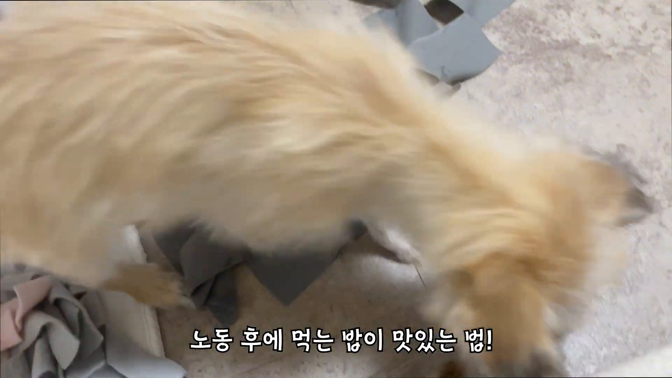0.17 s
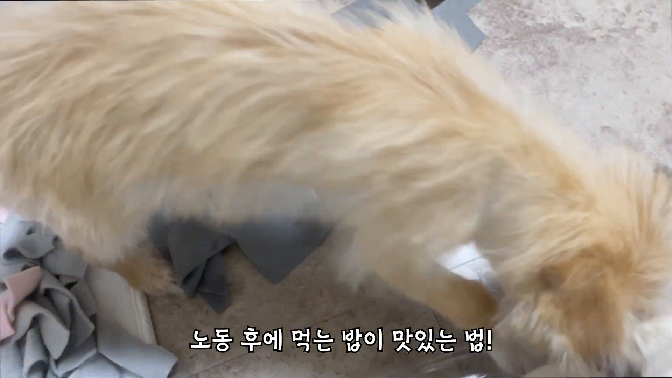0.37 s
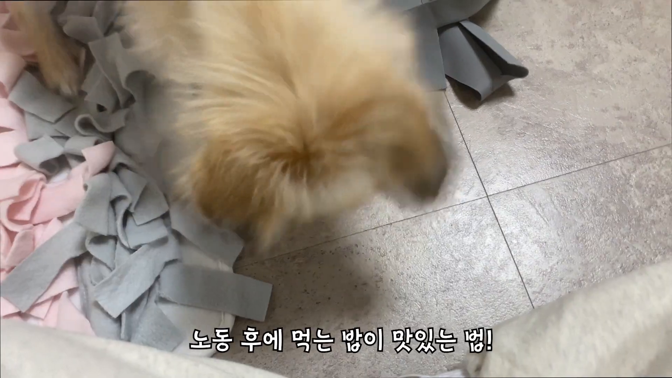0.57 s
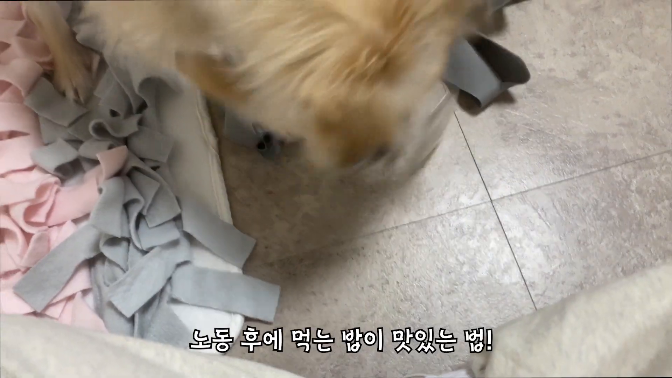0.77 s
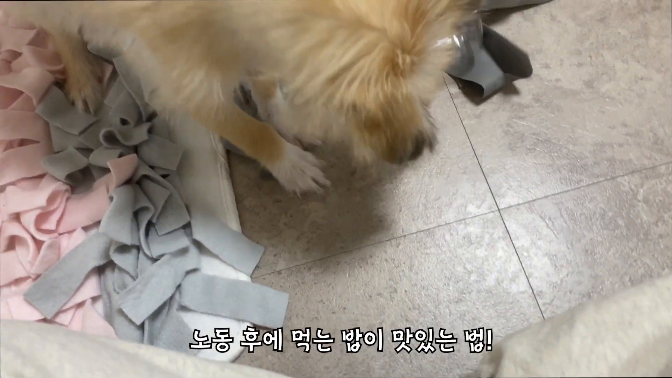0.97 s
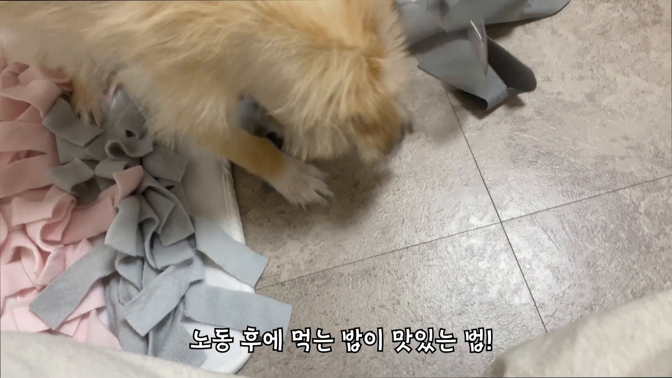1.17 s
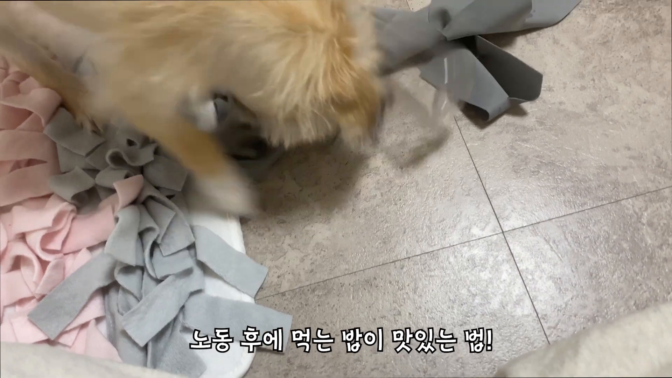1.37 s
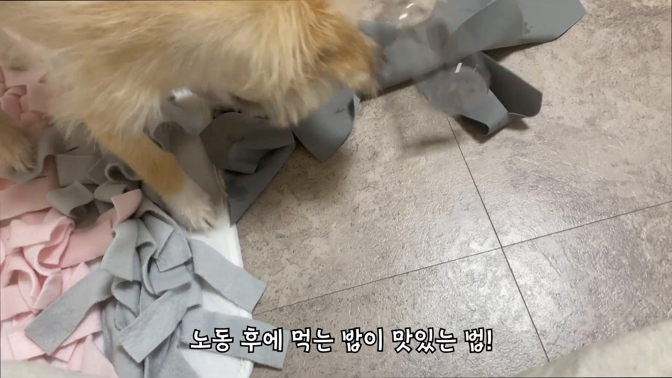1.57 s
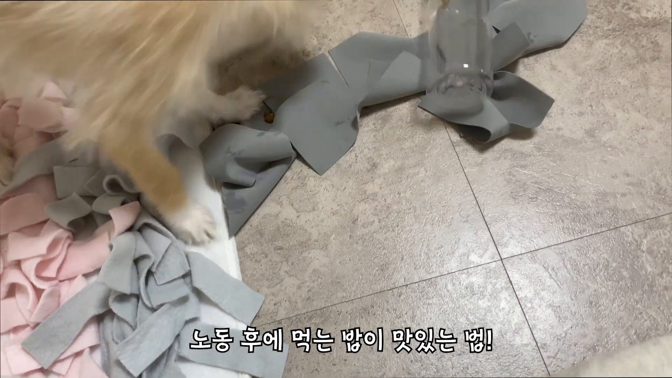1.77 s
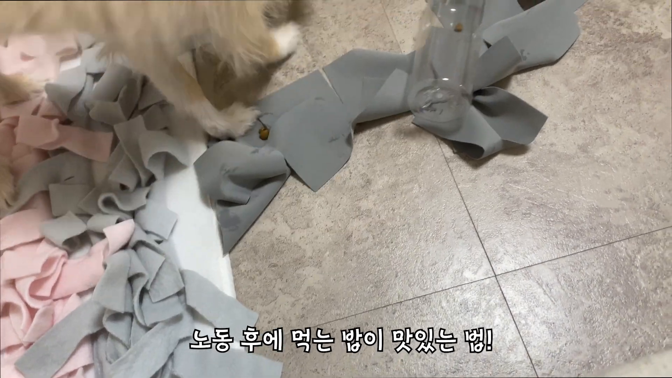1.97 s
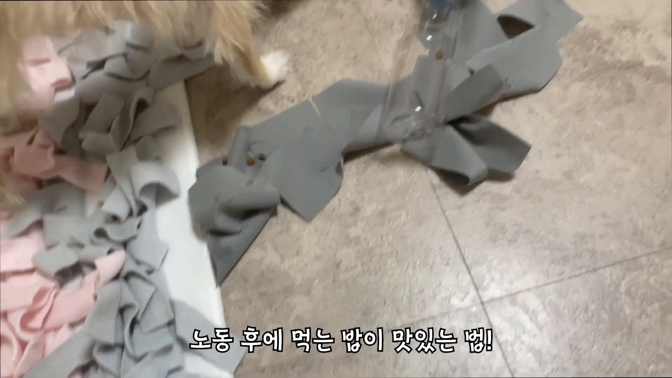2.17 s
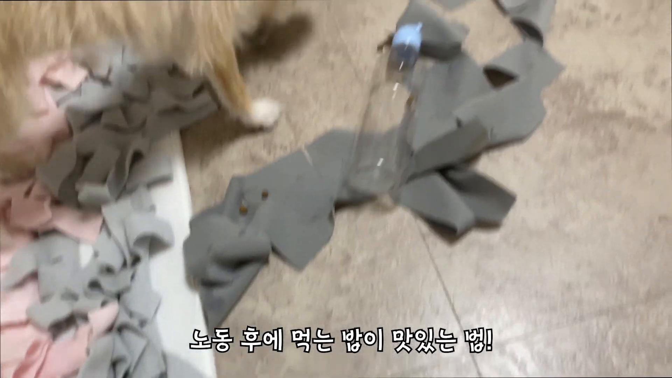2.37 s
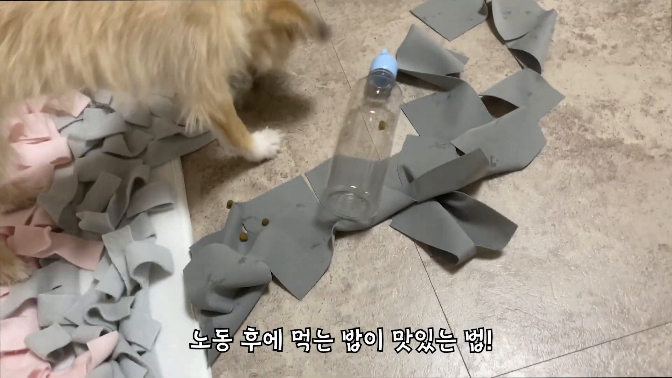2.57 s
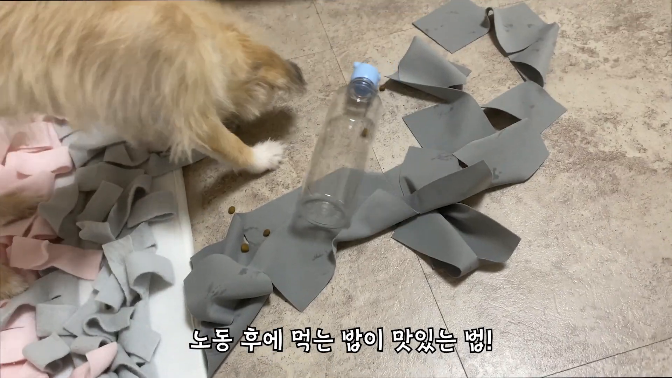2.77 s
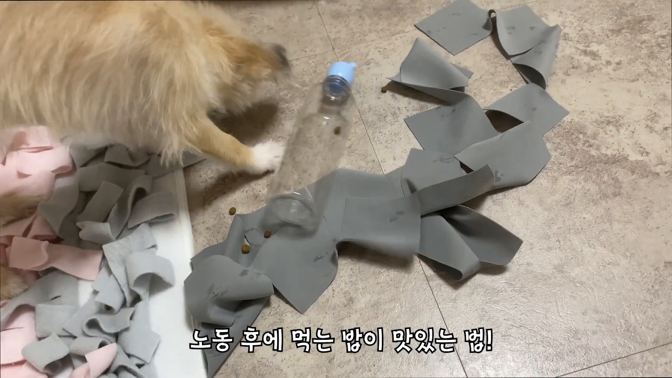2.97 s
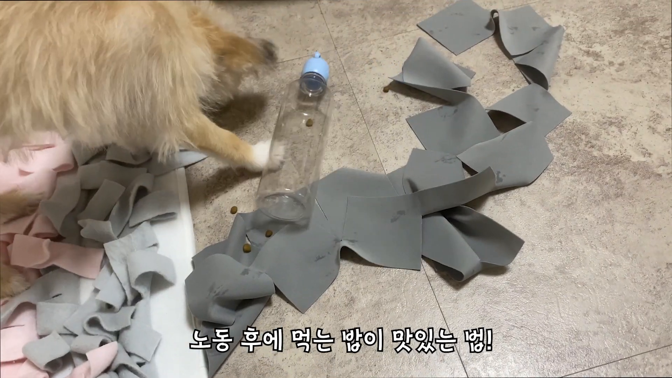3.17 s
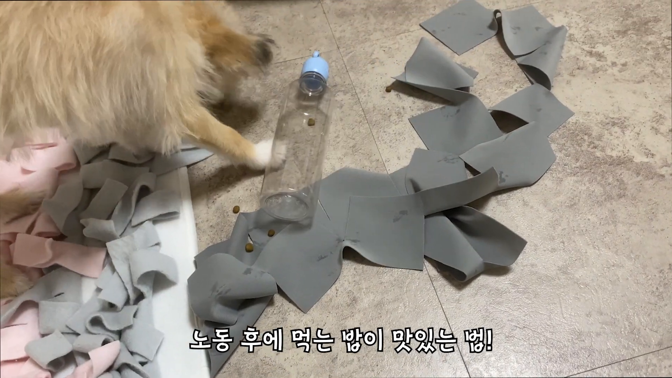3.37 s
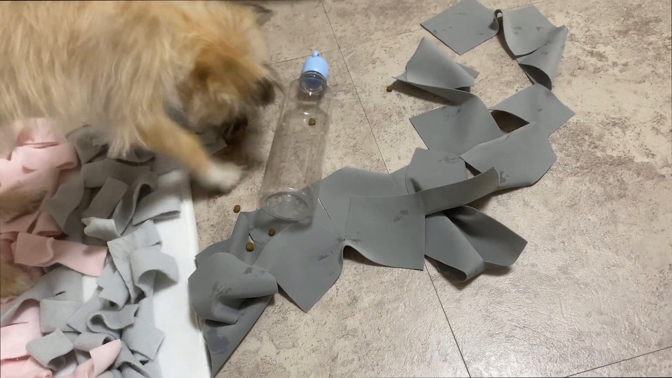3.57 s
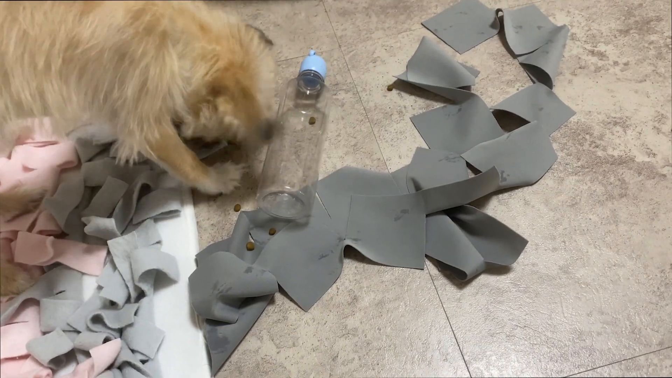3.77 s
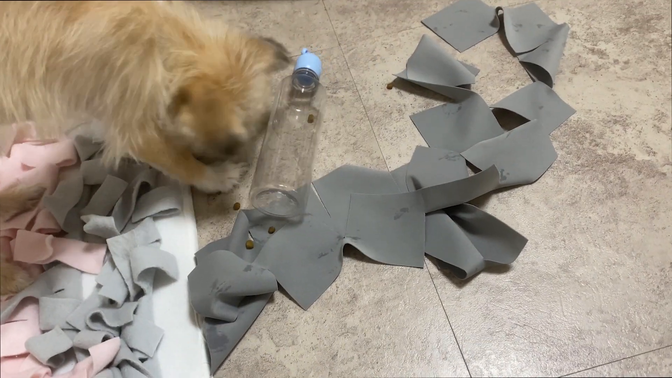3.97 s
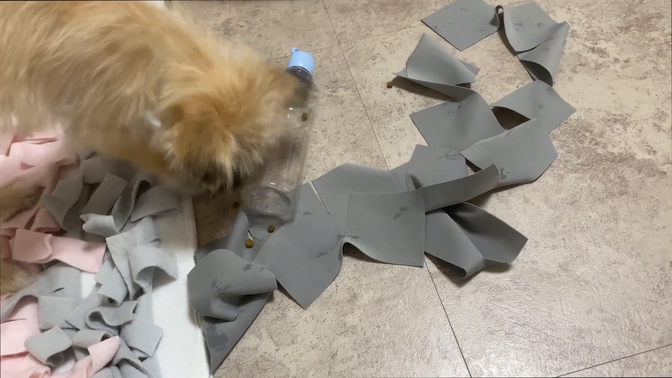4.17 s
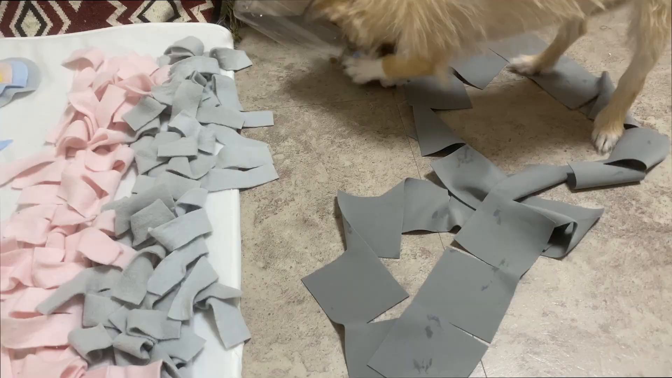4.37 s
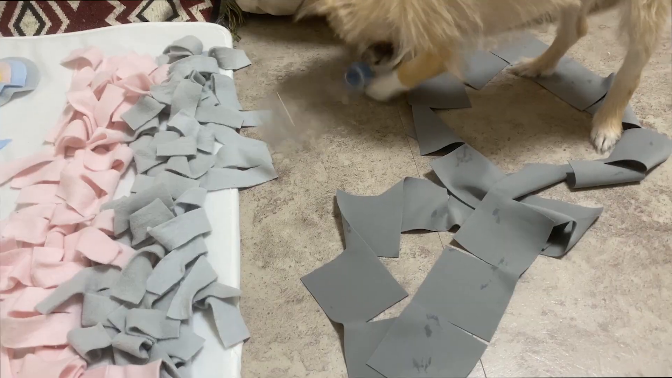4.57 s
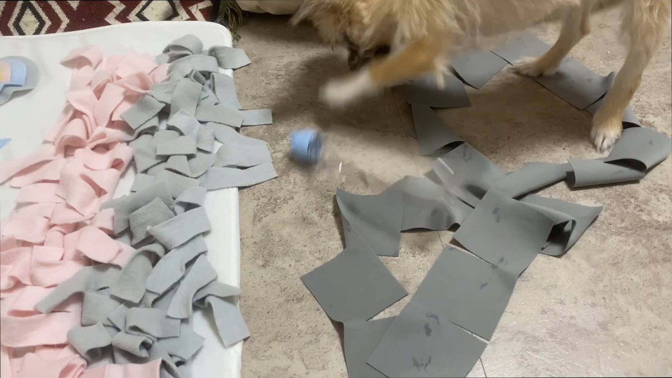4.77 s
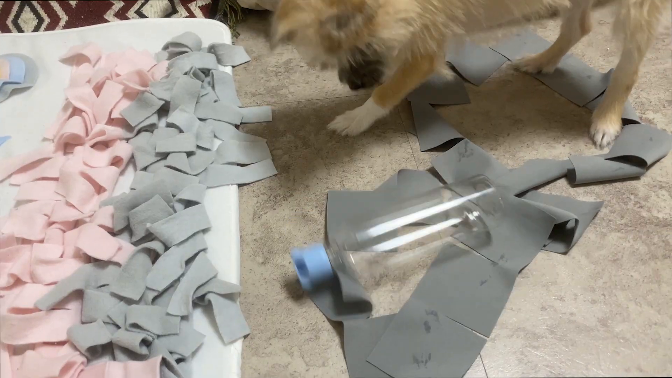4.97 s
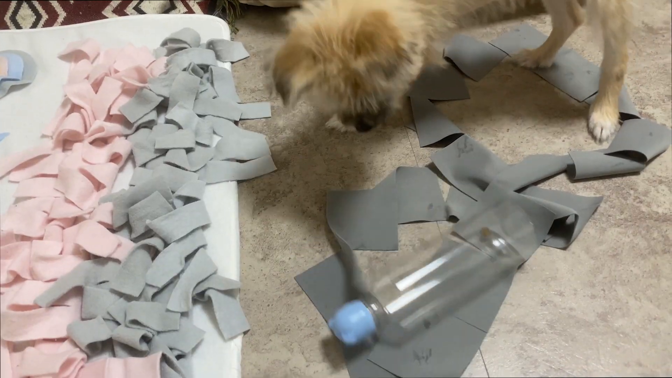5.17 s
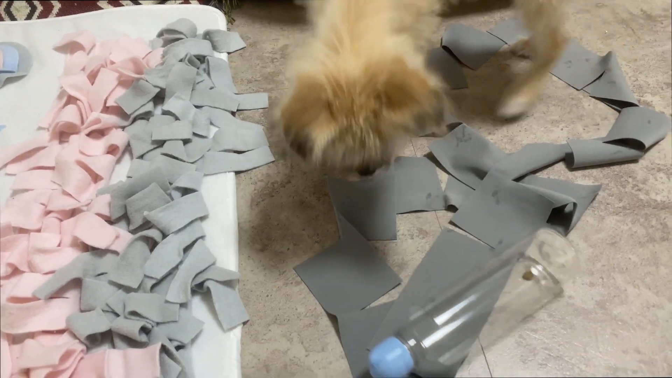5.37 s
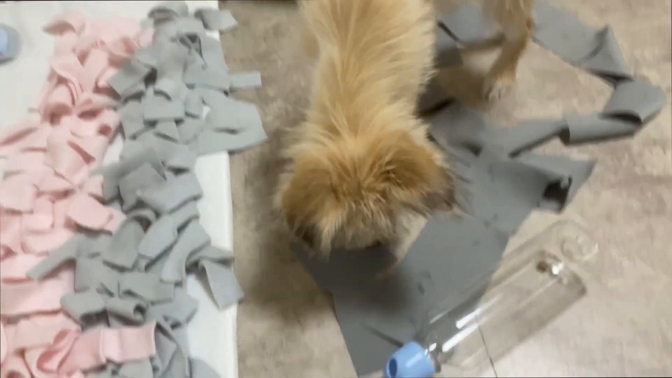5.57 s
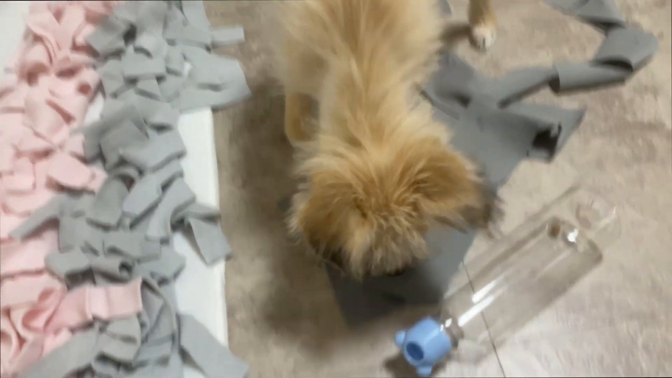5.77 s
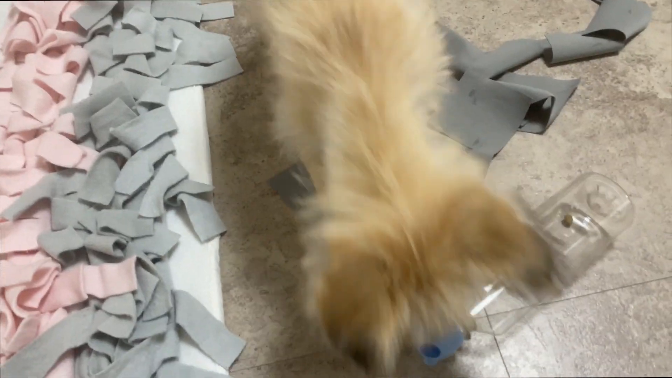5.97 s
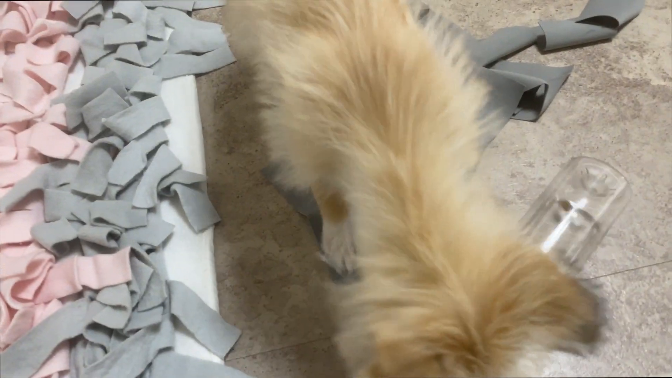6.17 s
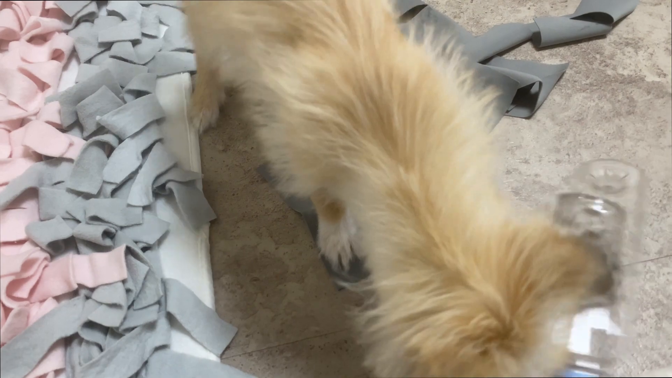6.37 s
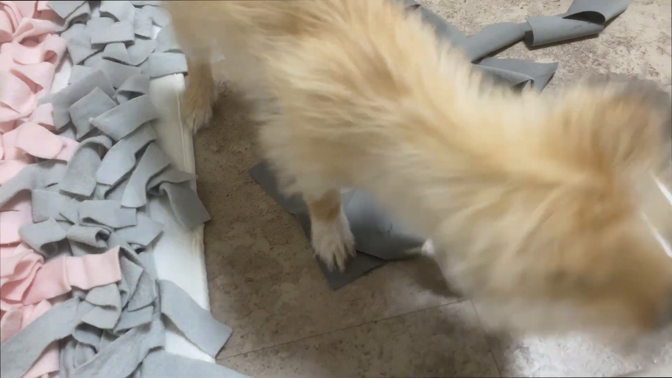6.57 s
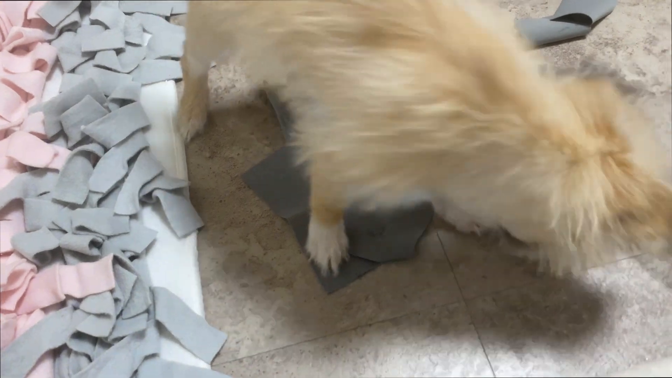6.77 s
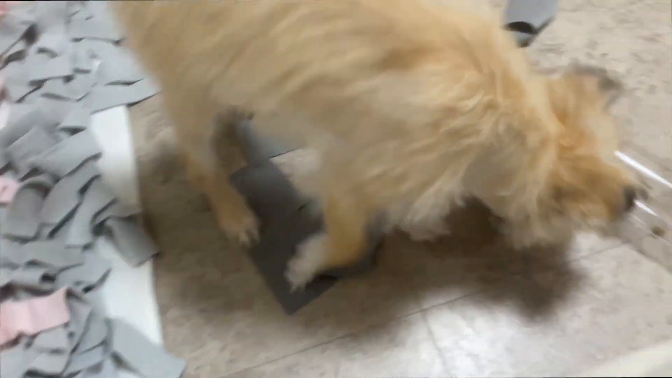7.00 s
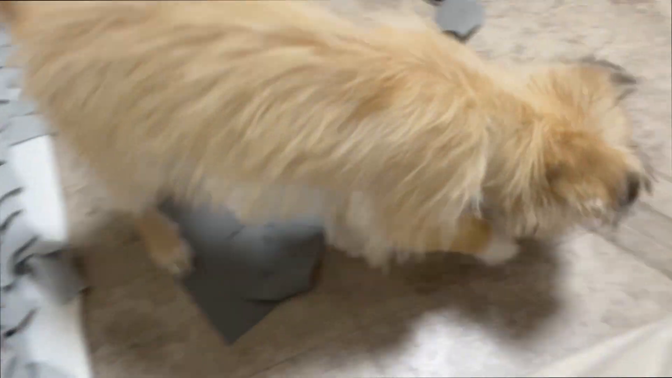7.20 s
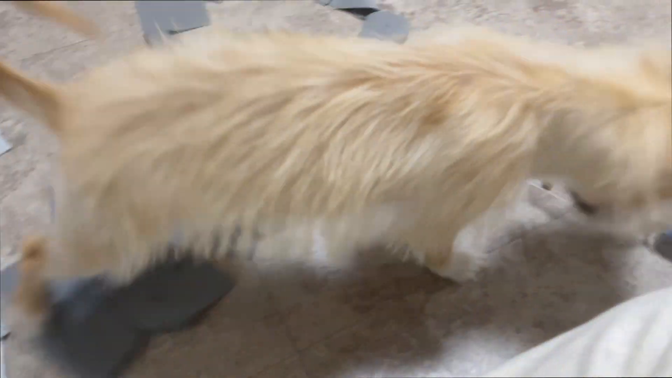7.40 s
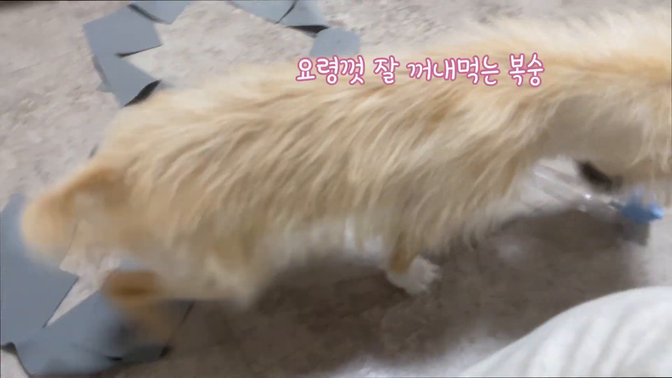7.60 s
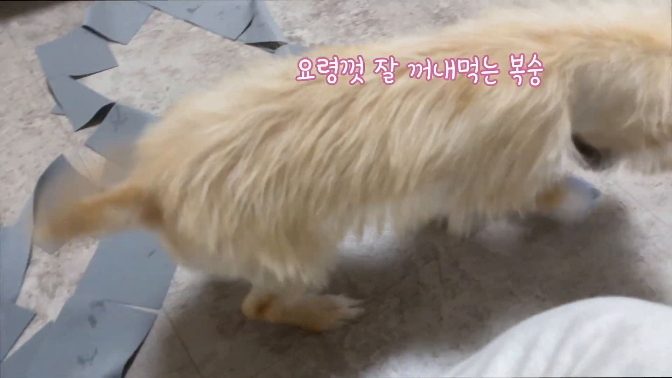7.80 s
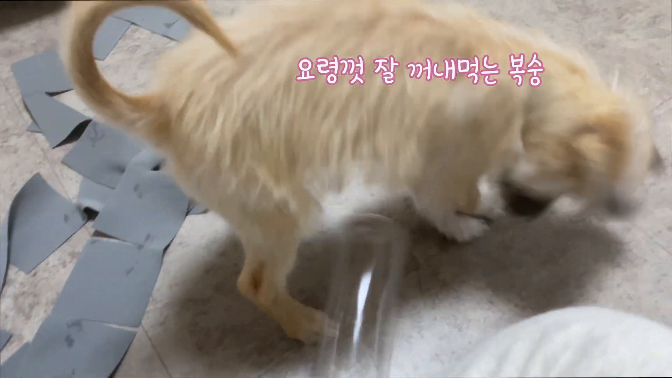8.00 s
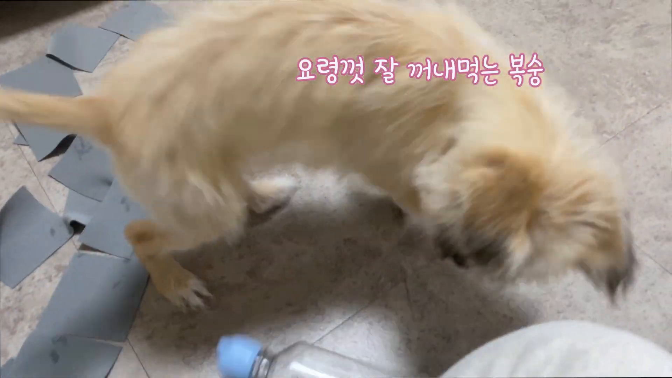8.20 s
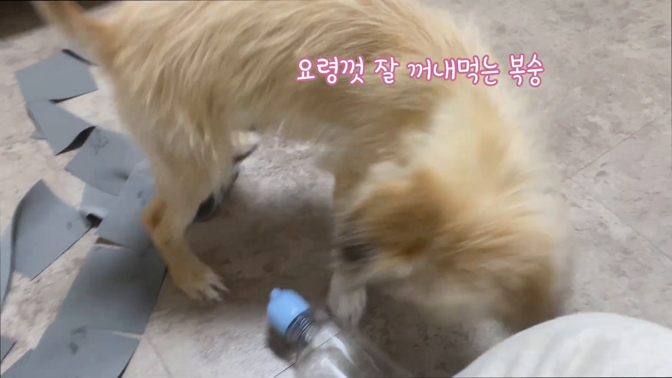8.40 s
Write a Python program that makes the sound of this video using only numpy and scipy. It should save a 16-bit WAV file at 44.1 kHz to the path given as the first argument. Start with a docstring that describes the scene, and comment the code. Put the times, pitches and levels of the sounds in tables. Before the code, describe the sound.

Hollow plastic bottle knocks and clatters on a hard indoor floor, dry kibble rattling inside, with lulls of soft paw taps and low hum.

```python
"""A plastic bottle, nosed and pawed by a puppy, knocks, rolls and booms on a vinyl floor: struck damped modes,
short noise cracks and a wavering neck tone. Dry kibble ticks and tumbles inside as random small contacts. Fur
and fleece rustle and the puppy licks (bursts of band noise); paws pat (dull sines falling in pitch). A low hum,
rumble, hiss and faint rising drone (shaped noise and a sine) fill a small room; hum and rumble are louder in
the first half. A phone held above hears it with two ports."""
import sys
import numpy as np
from scipy import signal
from scipy.fft import rfft, irfft, next_fast_len
from scipy.io import wavfile
from scipy.ndimage import map_coordinates

SR = 44100
rng = np.random.default_rng(int(sys.argv[2]) if len(sys.argv) > 2 else 0)


def decibels_to_gain(level_db):
    """Convert a level in decibels to a linear amplitude gain (20 dB per decade)."""
    exponent = np.asarray(level_db, float) / 20
    return 10 ** exponent


def master_out(mix):
    """Clip the mix to full scale and print it as 16-bit PCM to the path in sys.argv[1]."""
    frames = np.transpose(np.atleast_2d(mix))
    ceiling = np.clip(frames, -1, 1)
    pcm = np.round(ceiling * 32767).astype(np.int16)
    wavfile.write(sys.argv[1], SR, pcm)


N = 372204

# Table levels are relative: the functions add trims.
# bottle knocks on the floor: [start_s, shell_db, body_above_shell_db, wall_above_shell_db,
# tick_above_shell_db, favoured_hz]
KNOCKS = [(0.2904, -34, 2, -13, -20, 2400), (0.3168, -41, 10, -12, -4.5, 2320),
          (0.3364, -40.5, 7, 0, 0, 2500), (0.4736, -10, -8, -18.5, -17.5, 1248),
          (0.496, -28, -7.5, -12, -23, 1203), (0.7175, -18, -3, 2.5, -13.5, 1570),
          (0.8733, -40.5, -32, -11, -5, 2444), (1.1713, -18, -6.5, -4, -20, 1312),
          (1.3386, -7.5, -29, -8, -25, 1433), (1.3908, -21.5, -2.5, 4, -10.5, 2280),
          (1.4013, -21, -29, -6, -3, 3930), (1.519, -15.5, -3, 1, -13.5, 1851),
          (1.5455, -25, -6, -4, -2, 2162), (1.6408, -11, -32, -3, -14, 2255),
          (4.5077, -26, -12.5, 0, -10, 1327), (4.556, -25, -11.5, -10, -17, 1315),
          (4.5981, -13, -12, -4, -11, 2608), (4.6743, -13, -42, -8, -13.5, 2481),
          (4.7434, -19.5, -34, -12, -17, 2410), (4.798, -32.5, 2.5, -10.5, -4, 2540),
          (5.0348, -38.5, -34, 1, -3, 2110), (6.2207, -27, -6, -8.5, -9.5, 2273),
          (6.2772, -31.5, 2, -7.5, 2, 2440), (6.3118, -32.5, 0, -3.5, -6, 2130),
          (6.339, -39.5, 8, 1.5, -0.5, 2290), (7.933, -35.5, -10, 4.5, -4.5, 2293),
          (8.061, -26, 1, -12, -9.5, 2360), (8.098, -14, -4, -4.5, -21, 1504),
          (8.1837, -32.5, 7.5, 3.5, -8.5, 2096), (8.231, -17, -3.5, -3.5, -23.5, 1535),
          (8.292, -21, 2, -1, -20.5, 1710), (8.338, -22, -2, -4.5, -16.5, 1685),
          (8.3864, -33.5, -3.5, -4, -10, 2500), (8.4354, -23, 0.5, -8, -15, 2434)]
# kibble pieces hitting the wall: [start_s, wall_db, tick_above_wall_db, favoured_hz]
KIBBLE_TICKS = [(0.1338, -42.5, 3, 3960), (0.3633, -38, -1, 2260), (0.5259, -27.5, 4.5, 2260),
                (0.6644, -52.5, 6.5, 3800), (0.7548, -31, 3, 2410), (0.7737, -31.5, 2, 4480),
                (0.795, -44.5, 15, 4900), (1.118, -53, 2.5, 2110), (1.196, -45, 12.5, 5440),
                (1.2313, -48.5, 13.5, 5560), (1.3014, -45.5, 3, 5400), (1.4471, -38.5, -4, 2570),
                (1.4738, -41.5, -3.5, 2170), (1.7274, -47, 3.5, 2500), (1.8221, -54, 0.5, 3730),
                (1.8657, -59, -14, 2460), (1.8881, -57, -7, 2089), (2.729, -62.5, 0, 4630),
                (2.838, -62, -11, 2400), (4.82, -47, 1.5, 2420), (4.8514, -48.5, -2, 3900),
                (4.9633, -45.5, 11.5, 4240), (4.9947, -40.5, -0.5, 2100), (5.0882, -40, 6.5, 2170),
                (5.127, -42, 1, 2090), (5.1762, -52, -2.5, 2200), (6.1492, -69.5, 7.5, 2440),
                (6.3554, -46.5, 0.5, 2400), (6.3684, -45.5, 5.5, 2240), (6.3971, -45.5, -5.5, 2300),
                (6.4198, -43, -9.5, 2410), (6.4374, -47.5, -12, 2360), (7.9545, -33.5, 3, 2380),
                (7.9772, -48.5, 15, 2300), (8.1454, -51.5, 15.5, 4870), (8.217, -31, -4, 4000)]
# rolling and tumbling, one list a push: [time_s, wall_db, shell_above_wall_db, fizz_above_wall_db, fizz_hz]
ROLL_PUSHES = [
    [(0.0, -39.5, 2.5, -3.5, 4050), (0.19, -44, 0, -7, 4070), (0.27, -58, -3.5, -0.5, 4110),
     (0.31, -45.5, 4.5, -3.5, 4000), (0.43, -50.5, 2, -2.5, 3930), (0.5, -50, 8, -10, 4690),
     (0.56, -74.5, 0.5, 2.5, 3980), (0.72, -42, -4, 2, 4600), (0.88, -55, -4, 8.5, 5160),
     (1.0, -60.5, 4.5, -5, 5630), (1.12, -57, -5.5, -11, 4540), (1.2, -47, -4, 2, 5360),
     (1.27, -57.5, 2, 2, 5540), (1.35, -49.5, 1, 5.5, 5030), (1.56, -54.5, -10.5, -6, 3860),
     (1.62, -62, -8, -3, 4280), (1.72, -61, 2, 11.5, 4300), (1.95, -78, -3.5, -8.5, 3940)],
    [(4.44, -88.5, 11.5, -2, 5000), (4.53, -47.5, 4, -9, 5000), (4.63, -47, 9, -5, 3870),
     (4.76, -44.5, -4, -8.5, 5220), (4.81, -47, -6, -6, 3660), (4.94, -75, 5, -4.5, 4270),
     (4.975, -62, 2, 3, 4200), (5.05, -55, 3.5, 2, 4030), (5.14, -55.5, -2, -0.5, 4550),
     (5.3, -95, -9.5, 5.5, 3930)],
    [(6.12, -95, 4, -1, 4500), (6.26, -69.5, 12, 8, 4820), (6.36, -54.5, 2, -1, 5000),
     (6.48, -51.5, -5.5, -12.5, 4880), (6.71, -58.5, -8, -13.5, 4040), (6.8, -87.5, -5, -29, 4400)],
    [(7.7, -86, -2, -4, 5360), (7.81, -54.5, 1, -4, 4860), (7.87, -45, 3.5, -6, 4610),
     (8.0, -45.5, -8, -7, 4170), (8.12, -51.5, 1, -2.5, 3900), (8.25, -51.5, -2, -2.5, 4040),
     (8.44, -52.5, 6, -7, 3600)],
]
# soft nudges in the lulls: [peak_s, fade_in_s, fade_out_s, shell_db, wall_db]
NUDGES = [(2.37, 0.037, .07, -57.5, -54), (2.73, 0.016, 0.021, -75, -59.5),
          (2.84, 0.016, 0.051, -60.5, -62), (3.16, 0.036, .06, -57, -53), (3.195, .05, .04, -55, -56),
          (3.52, .12, .04, -62, -85.5), (4.32, 0.071, .035, -67.5, -61), (5.366, .004, 0.14, -60.5, -63.5),
          (5.46, .01, .04, -73.5, -69.5), (5.63, .006, 0.18, -71, -66.5), (5.76, 0.043, .05, -63, -61),
          (5.82, .08, 0.035, -59, -63), (6.902, .012, 0.041, -75.5, -75.5), (7.02, 0.05, .08, -66, -69),
          (7.304, .04, 0.24, -82, -76), (7.624, .012, .06, -65, -53.5)]
# place of the contacts: [time_s, left_right_db]
PLACE = [(0, -0.5), (1.9, 2), (4.5, 0.5), (5.2, 2.5), (6.2, 5), (6.8, 6.5), (7.7, 1.1)]
# bottle modes: [pitch_hz, level_db, t60_s]
BOTTLE_MODES = [(478.1, -1, 0.017), (572, -17, 0.066), (737, -13.5, 0.12), (889, -2.5, 0.012),
                (1113, -14, 0.17), (1097.6, 1, 0.054), (1187, -18.5, 0.087), (1306, -14.5, .02),
                (1700, -13, 0.0055), (1716, -8.5, 0.032), (1997, -1, 0.008), (2170, -30.5, 0.15),
                (2410, -1.5, 0.023), (2896, -9.5, 0.023), (3807, -14.5, 0.056), (3930, -10, 0.032),
                (4250, -14, 0.049), (4610, -9.5, 0.03), (5000, -14, 0.037), (5325, -7, 0.02),
                (5640, -9.5, 0.043), (6540, -3.5, 0.014), (7290, -15.5, 0.059)]
# zone centres, body, shell, wall, tick: [pitch_hz]
ZONES_HZ = [500, 1100, 2300, 3900]
# spectrum of the dry crack: [freq_hz, level_db]
CRACK_SPECTRUM = [(1500, -120), (3300, -6), (4200, 8), (9000, 4), (13000, -5.5), (16000, -19),
                  (17000, -120)]
# jolts to the air in the bottle: [start_s, level_db]
JOLTS = [(0.22, -36), (0.368, -32), (0.478, -30), (0.64, -48), (1.3, -34), (1.391, -20), (1.548, -32),
         (1.645, -29), (1.765, -44), (4.6, -44), (4.685, -45), (4.95, -50), (5.1, -46.5), (6.24, -42),
         (6.29, -43), (6.46, -75), (7.02, -45), (7.76, -47.5), (7.935, -37), (7.972, -31), (8.186, -36.5),
         (8.3, -39), (8.384, -34)]
# background level, dropping abruptly midway: [time_s, hum_db, rumble_db]
AIR = [(0.0, -47.5, -57), (0.6, -42, -63), (1.7, -44.5, -61), (2.5, -46, -63), (2.9, -44, -62),
       (4.41, -41.5, -60.5), (4.43, -54.5, -84), (4.75, -55, -80), (5.4, -54, -75), (6.0, -56.5, -78.5),
       (6.6, -58, -74), (7.1, -52, -76), (7.5, -59, -74.5), (8.1, -51, -70), (8.44, -62, -82)]
# hum spectrum: [freq_hz, level_db_per_hz]
HUM_SPECTRUM = [(15, -41), (25, -14), (41, -7.5), (59, 5.5), (70, -3.5), (103, -11), (129, -21), (140, -22),
                (180, -46.5), (310, -120)]
# room rumble spectrum: [freq_hz, level_db]
RUMBLE_SPECTRUM = [(71, -25.5), (120, -3), (152, -11), (222, -4), (449, -16), (1010, -21), (1100, -28),
                   (1370, -26.5), (2390, -38.5), (4000, -46.5), (5200, -76), (8800, -120)]
# microphone hiss spectrum: [freq_hz, level_db]
HISS_SPECTRUM = [(880, -37.5), (1500, -1), (3870, -10.5), (4400, -8), (8660, -2.5), (9390, -4),
                 (12600, -8.5), (13600, -40)]
# drone: [time_s, pitch_hz, level_db]
DRONE = [(3.58, 248.2, -64.5), (3.64, 252, -57), (4.02, 263.7, -48), (4.3, 269, -51), (4.41, 271.9, -54)]
# rustles and licks: [start_s, length_s, level_db, lowest_hz]
RUSTLES = [(1.967, .012, -68, 6060), (2.096, .012, -72, 7020), (2.165, 0.013, -63, 6050),
           (2.326, .11, -69.5, 6500), (2.605, 0.015, -73, 6000), (2.692, .09, -71, 4340),
           (3.13, 0.1, -65.5, 4500), (3.414, 0.014, -62, 5000), (3.715, 0.014, -73, 5000),
           (3.748, 0.02, -69, 5000), (4.299, 0.033, -70.5, 7000), (7.289, 0.17, -72, 7940),
           (7.619, 0.05, -64, 3480)]
# paw pats: [start_s, level_db, reference_hz]
PAWS = [(2.385, -31, 217), (4.577, -33, 222), (4.599, -25.5, 282), (4.773, -35.5, 150), (4.788, -29.5, 328),
        (4.871, -32, 298), (4.938, -42, 232), (4.953, -44, 348), (4.995, -36, 241), (5.044, -41, 334),
        (6.954, -42, 252), (7.161, -37.5, 178.2)]
# background likeness at the ports: [freq_hz, correlation]
ALIKE = [(60, .98), (170, .92), (260, .8), (450, .3), (700, .55), (1100, .25), (2300, .55), (5000, .4),
         (6500, .25), (8300, .85), (13000, .85)]
# background port level difference: [freq_hz, left_right_db]
FAR_TILT = [(60, 1.5), (700, 2.2), (2300, .8), (4500, -4.5), (8300, -2.5), (11000, -.5)]
# background port phase difference: [freq_hz, left_right_rad]
FAR_LEAD = [(60, .2), (200, .2), (300, .8), (500, 2.6), (1600, 3.2), (2100, -.6), (5000, -1.6),
            (8300, -2.1), (11000, -1), (13800, 0)]
# near-sound port level difference: [freq_hz, left_right_db]
NEAR_TILT = [(150, 2), (500, 3), (1500, 1.26), (6000, -7), (13000, 0.66)]
# near-sound port phase difference: [freq_hz, left_right_rad]
NEAR_LEAD = [(100, .1), (430, -.1), (1550, -.25), (2300, -.5), (4000, -.8), (5700, -2.2), (8300, -2.1),
             (10000, -1.4), (11700, -.6), (13800, -.1)]
# decay of the room's answer: [freq_hz, t60_s]
WALLS = [(200, .3), (1000, 0.23), (4000, .25), (12000, 0.037)]
# brief drops in level of all near sounds and their echo: [start_s, loss_db]
DIPS = [(0.51, 17.5), (1.372, 4.5), (8.135, 3.5)]

TICK_BODY_DB, TICK_SHELL_DB = -17, -9.5  # against the wall
NUDGE_FADE_DB, NUDGE_FIZZ_DB = 29.5, -14  # loss over one fade; fizz against the wall
BIGGEST_STEPS, CLUMP_DB = 4.5, 3.2  # grain size limit in mean steps; swell of grain clumps
PAN_SCATTER_DB, STRENGTH_SCATTER_DB = 2, 2.5  # contact to contact
FAVOUR_DB, FAVOUR_WIDTH_LOG_HZ = 10.5, 0.09
CLUSTER_HZ, DULL_CYCLES = 400, 60  # modes dying within fewer cycles are dull
CRACK_T60_S = 0.008
NECK_HZ, BOOM_WAVER_DB = 209.1, 5
ROLL_BOOM_DB, FIZZ_DULLS, IDLE_BOOM_DB = -15, 0.56, -7.5  # FIZZ_DULLS: boom dB lost per fizz dB
JOLT_ATTACK_S, JOLT_T60_S = 0.0082, 0.21
ROLL_RUMBLE_DB, RUMBLE_WAVER_DB, HISS_DB = -13.5, 1.2, -84
GRIT_DB = 5
WET_DB = -13.5
DIP_S, RETURN_S = 0.002, 0.078
TOP = 0.88  # ceiling of the rounded peaks


def unit(x):
    """Scale to rms 1."""
    return x / np.sqrt(np.mean(x ** 2) + 1e-20)


def along(points, hz):
    """Interpolate (Hz, value) points on a log-frequency axis."""
    f, v = np.transpose(points)
    return np.interp(np.log(hz + 1), np.log(f + 1), v)


def curves(rows, **ends):
    """One value per sample for each column after the time."""
    s, *cols = np.transpose(rows)
    return [np.interp(np.arange(N) / SR, s, c, **ends) for c in cols]


def wobble(knots_per_s):
    """Smooth random curve."""
    knots = rng.standard_normal(int(N * knots_per_s / SR) + 4)
    return map_coordinates(knots, [np.arange(N) * knots_per_s / SR])


def filtered(x, response):
    """Apply a complex frequency response."""
    m = next_fast_len(N + SR // 2)
    return irfft(rfft(x, m) * response(np.fft.rfftfreq(m, 1 / SR)), m)[..., :N]


def ports(pair, tilt, lead):
    """Level and phase differences between the two microphone ports, split evenly."""
    def half(points, hz):
        return np.outer([0.5, -0.5], along(points, hz))

    return filtered(pair, lambda hz: decibels_to_gain(half(tilt, hz)) * np.exp(1j * half(lead, hz)))


def stir():
    """Bottle motion per sample: shell, wall and fizz dB, brightest fizz Hz."""
    roll_db, shell_db, fizz_db, fizz_hz = curves(np.vstack(ROLL_PUSHES))
    zones_db = np.array([roll_db + shell_db, roll_db, roll_db + fizz_db])
    t = np.arange(N) / SR
    for peak_s, rise_s, fall_s, shell_db, wall_db in NUDGES:
        fade_db = NUDGE_FADE_DB * np.maximum((peak_s - t) / rise_s, (t - peak_s) / fall_s)
        nudge_db = np.c_[[shell_db, wall_db, wall_db + NUDGE_FIZZ_DB]]
        zones_db = np.maximum(zones_db, nudge_db - fade_db)
    return *zones_db, fizz_hz


def contacts(count=6500):
    """Knocks, kibble ticks and random kibble and floor grains: sample, dB in each zone, favoured Hz."""
    knock_s, shell, body, wall, tick, knock_hz = np.transpose(KNOCKS)
    knocks_db = shell + np.array([body + 2, 0 * shell - 1, wall + 1, tick + 1])
    tick_s, wall, tick, tick_hz = np.transpose(KIBBLE_TICKS)
    ticks_db = wall + np.array([0 * wall + TICK_BODY_DB, 0 * wall + TICK_SHELL_DB, 0 * wall, tick])

    grain_at = np.sort(rng.integers(0, N, count))
    steps = np.minimum(rng.exponential(size=count), BIGGEST_STEPS)
    size_db = 3.4 * steps + CLUMP_DB * wobble(30)[grain_at]  # few big grains, in clumps
    shell_db, wall_db, fizz_db, fizz_hz = (c[grain_at] for c in stir())
    grains_db = size_db + np.array([shell_db - 8.5, shell_db - 11.5, wall_db - 3.5, fizz_db - 11.5])

    listed_at = np.minimum(np.round(np.r_[knock_s, tick_s] * SR).astype(int), N - 1)
    at = np.r_[listed_at, grain_at]
    return at, np.c_[knocks_db, ticks_db, grains_db], np.r_[knock_hz, tick_hz, fizz_hz]


def train(at, size, pan_db):
    """Stereo impulses at the given samples."""
    return np.array([np.bincount(at, size * decibels_to_gain(side * pan_db), N)[:N] for side in (0.5, -0.5)])


def ring(blows, hz, t60_s):
    """Damped mode: each blow starts a dying sine of its own size."""
    r, w = decibels_to_gain(-60 / (t60_s * SR)), 2 * np.pi * hz / SR
    return signal.lfilter([0, r * np.sin(w)], [1, -2 * r * np.cos(w), r * r], blows)


def bottle():
    """Each contact rings every mode at a new strength and adds a short dry noise crack."""
    at, zones_db, favoured_hz = contacts()
    light = np.arange(len(at)) >= len(KNOCKS) + len(KIBBLE_TICKS)
    pan_db = curves(PLACE)[0][at] + PAN_SCATTER_DB * rng.standard_normal(len(at))
    scatter = rng.standard_normal((len(at), len(BOTTLE_MODES)))
    pose = rng.integers(-1, 2, scatter.shape)  # soft wall held flat, true or sharp
    sign = np.where(light, rng.choice([-1, 1], len(at)), 1)  # grains strike from either side
    out = np.zeros((2, N))
    for k, (hz, mode_db, t60_s) in enumerate(BOTTLE_MODES):
        share = [np.interp(np.log(hz), np.log(ZONES_HZ), row) for row in np.eye(len(ZONES_HZ))]
        distance = np.log(hz / favoured_hz) / FAVOUR_WIDTH_LOG_HZ
        bright_db = FAVOUR_DB * np.exp(-distance ** 2)  # where it was struck
        held_db = -6.5 * light * (hz * t60_s < DULL_CYCLES)  # light grains hardly dent the wall
        level_db = share @ zones_db + mode_db + bright_db + held_db
        level_db = level_db + STRENGTH_SCATTER_DB * scatter[:, k]
        phase = (-1) ** round(hz / CLUSTER_HZ)  # close modes start together, clusters alternate
        size = phase * sign * decibels_to_gain(level_db)
        for bend in (-1, 0, 1):
            blows = train(at, size * (pose[:, k] == bend), pan_db)
            out += ring(blows, hz * (1 + 0.024 * bend), t60_s)
    crack = train(at, decibels_to_gain(zones_db[-1] + 3.0 - 3.1 * light), pan_db)
    envelope = signal.lfilter([1], [1, -decibels_to_gain(-60 / (CRACK_T60_S * SR))], crack)
    burst = envelope * rng.standard_normal(N)
    return out + filtered(burst, lambda hz: decibels_to_gain(along(CRACK_SPECTRUM, hz)))


def neck():
    """Air booms through the bottle neck, a wavering sine driven by jolts, rolling and room rumble."""
    hz = NECK_HZ + 4 * wobble(14)
    roll_db, _, fizz_db, _ = curves(np.vstack(ROLL_PUSHES))
    rolling = decibels_to_gain(roll_db + ROLL_BOOM_DB - FIZZ_DULLS * fizz_db)  # less when only the kibble slides
    idle = decibels_to_gain(curves(AIR)[1] + IDLE_BOOM_DB)
    size = (rolling + idle) * decibels_to_gain(BOOM_WAVER_DB * wobble(18))
    for start_s, db in JOLTS:
        t = np.maximum(np.arange(N) / SR - start_s, 0)
        size = size + decibels_to_gain(db + 1.5 - 60 * t / JOLT_T60_S) * (1 - np.exp(-t / JOLT_ATTACK_S))
    return size * np.sin(2 * np.pi * np.cumsum(hz) / SR)


def rush(spectrum):
    """Stereo noise, scaled to rms 1, partly shared by the ports."""
    def response(hz):
        turn = np.arccos(np.clip(along(ALIKE, hz), 0, 1)) / 2
        return decibels_to_gain(along(spectrum, hz)) * np.array([np.cos(turn), np.sin(turn)])

    mid, side = filtered(rng.standard_normal((2, N)), response)
    return unit(ports(np.array([mid + side, mid - side]), FAR_TILT, FAR_LEAD))


def background():
    """Shaped noise for hum, room and rolling rumble and hiss; a slowly rising sine for the drone."""
    hum_db, room_db = curves(AIR)
    hum = decibels_to_gain(hum_db + 1.5) * rush(HUM_SPECTRUM)
    rumble_size = decibels_to_gain(room_db + 5.0) + decibels_to_gain(curves(np.vstack(ROLL_PUSHES))[0] + ROLL_RUMBLE_DB)
    rumble = rumble_size * decibels_to_gain(RUMBLE_WAVER_DB * wobble(15)) * rush(RUMBLE_SPECTRUM)
    drone_hz = curves(DRONE)[0]
    drone_db = curves(DRONE, left=-120, right=-120)[1] + 1.5 * wobble(5.9)
    drone = decibels_to_gain(drone_db) * np.sin(2 * np.pi * np.cumsum(drone_hz) / SR)
    return hum + rumble + drone + decibels_to_gain(HISS_DB) * rush(HISS_SPECTRUM)


def rustle():
    """Short bursts of band-limited noise from rustling fur and fleece and licks, roughened by wet little ticks."""
    out = np.zeros(N)
    grit = decibels_to_gain(GRIT_DB * wobble(330))
    for start_s, length_s, db, low_hz in RUSTLES:
        start, n = round(start_s * SR), round(length_s * SR)
        band = signal.butter(2, [low_hz, 13500], "band", fs=SR, output="sos")
        puff = unit(signal.sosfilt(band, rng.standard_normal(n)) * grit[start:][:n])
        out[start:][:n] += decibels_to_gain(db) * np.hanning(n) * puff
    return out


def paws():
    """Soft pads: a barely ringing push falling from 1.49 towards 0.49 of its reference pitch."""
    out, t = np.zeros(N), np.arange(SR // 10) / SR
    for start_s, db, hz in PAWS:
        cycles = np.cumsum(hz * (0.49 + np.exp(-t / 0.0061))) / SR
        envelope = decibels_to_gain(db + 7.0 - 60 * t / 0.036) * (1 - np.exp(-t / 0.0038))
        out[round(start_s * SR):][:len(t)] += envelope * np.sin(2 * np.pi * cycles)
    return out


def walls(x):
    """Room answer: delayed noise tail, each frequency dying at its own speed."""
    hz, t, z = signal.stft(rng.standard_normal((2, SR // 2)), SR, nperseg=256)
    decay = decibels_to_gain(-60 * t / along(WALLS, hz)[:, None])
    tail = signal.istft(z * decay, SR, nperseg=256)[1]
    late = np.pad(x, (260, 0))[None]  # delay in samples
    return signal.fftconvolve(late, tail / np.linalg.norm(tail[0]), axes=1)[:, :N]


def dip():
    """Gain of all near sounds and their echo: drops quickly at each dip, then returns."""
    start_s, loss_db = np.transpose(DIPS)
    t = np.maximum(np.arange(N) / SR - np.c_[start_s], 0)
    return decibels_to_gain(-loss_db @ ((1 - np.exp(-t / DIP_S)) * np.exp(-(t / RETURN_S) ** 2)))


def scene():
    """Near sounds reach the ports unequally, the room answers, both dip briefly; the background is added."""
    near = bottle() + neck() + rustle() + paws()
    direct = ports(near, NEAR_TILT, NEAR_LEAD)
    echo = decibels_to_gain(WET_DB) * walls(near.mean(axis=0))
    return dip() * (direct + echo) + background()


def band_limit(x):
    """A steep low-pass at the top of the band."""
    return signal.sosfilt(signal.butter(12, 16330, fs=SR, output="sos"), x)


def record(dry):
    """The microphone drops the lowest bass; the input stage rounds off loud peaks."""
    low_cut = signal.butter(6, 40, "high", fs=SR, output="sos")
    heard = signal.sosfilt(low_cut, dry)
    mix = heard / (1 + np.abs(heard / TOP) ** 6) ** (1 / 6)
    return band_limit(mix)


dry = scene()
out = record(dry)
master_out(out)
```